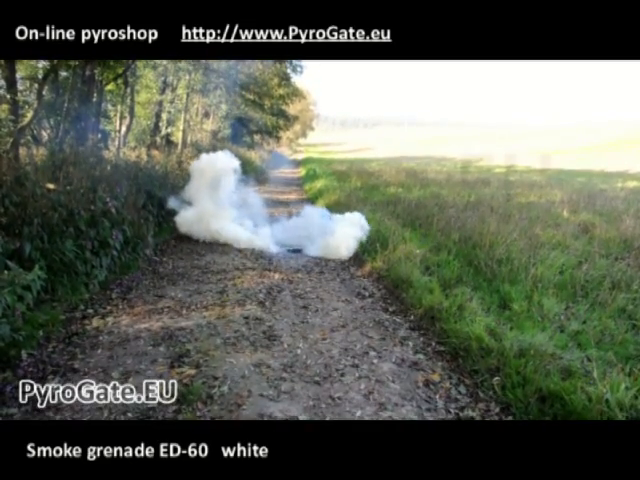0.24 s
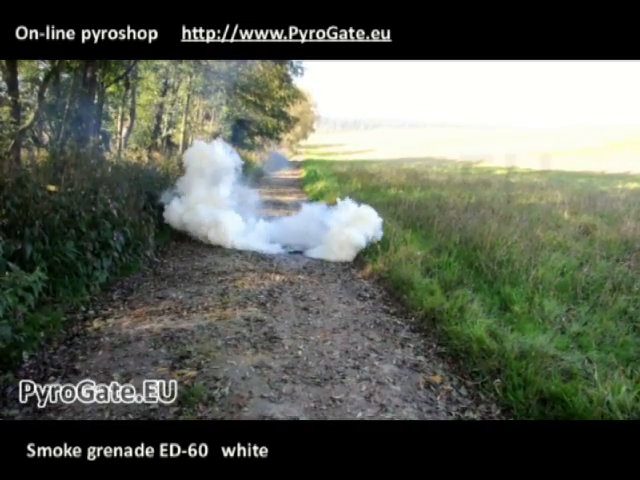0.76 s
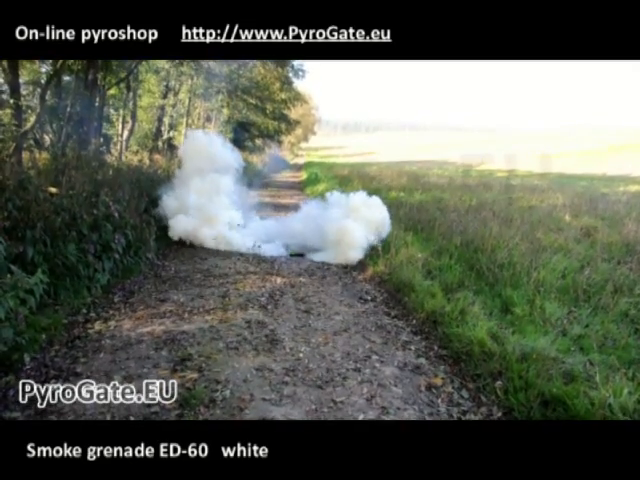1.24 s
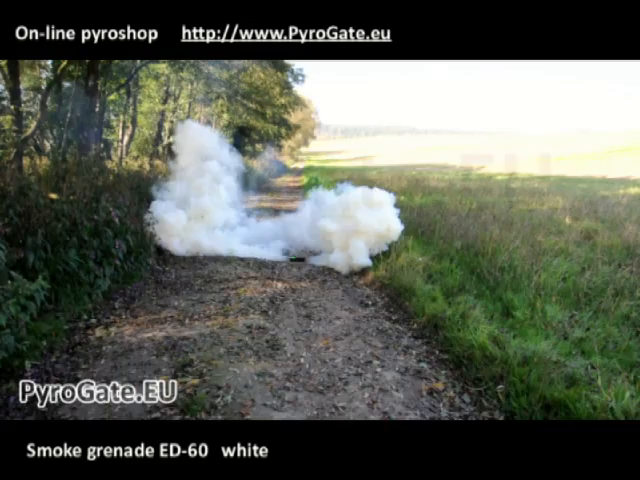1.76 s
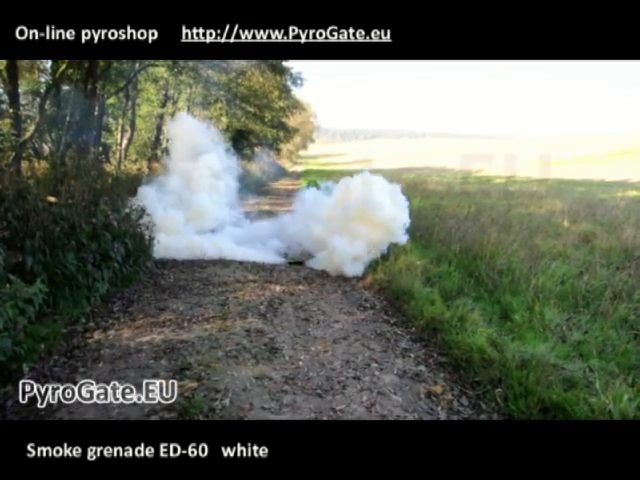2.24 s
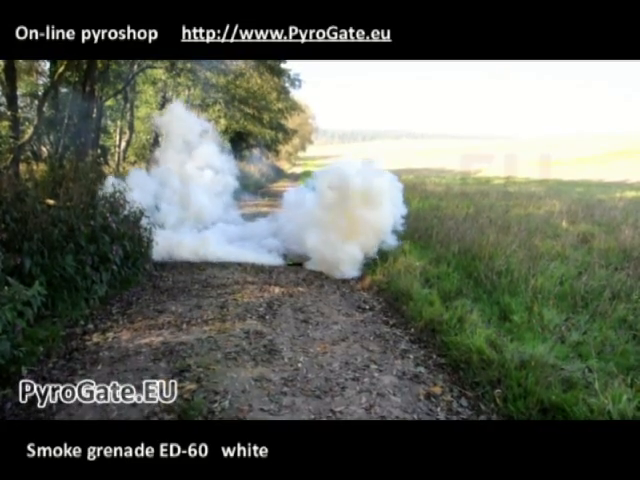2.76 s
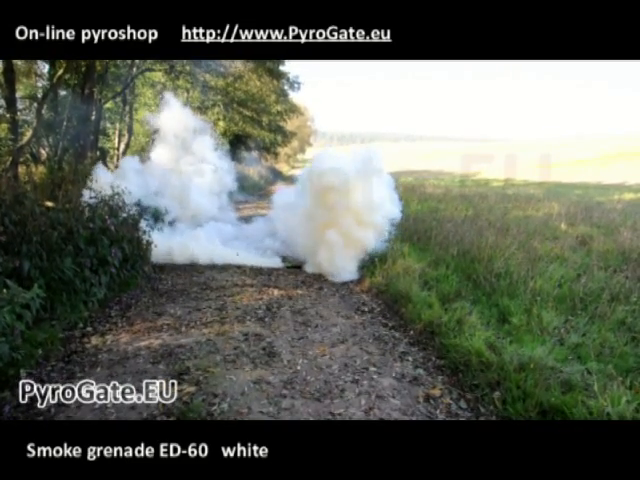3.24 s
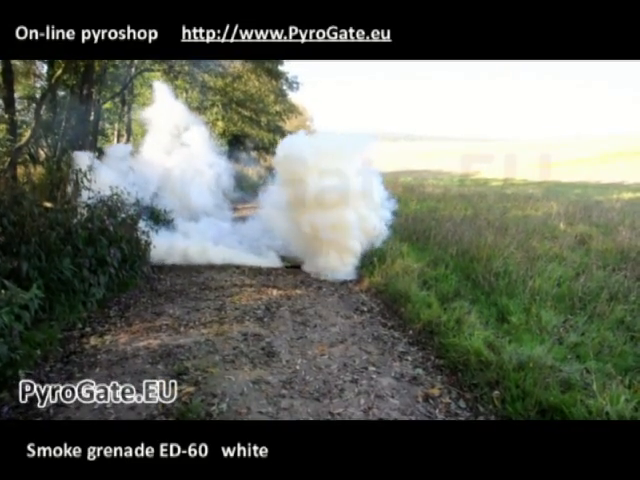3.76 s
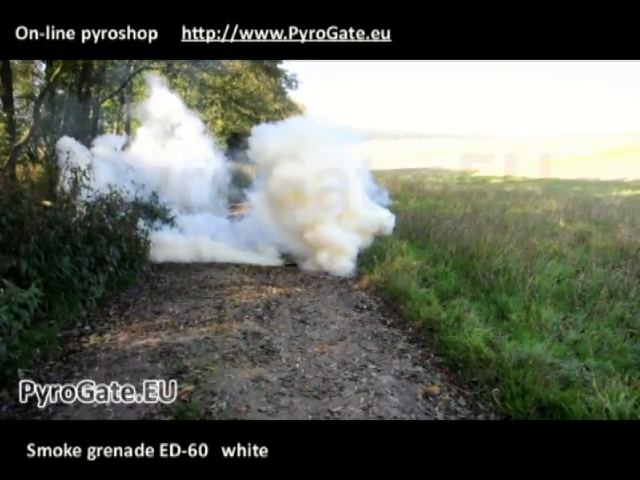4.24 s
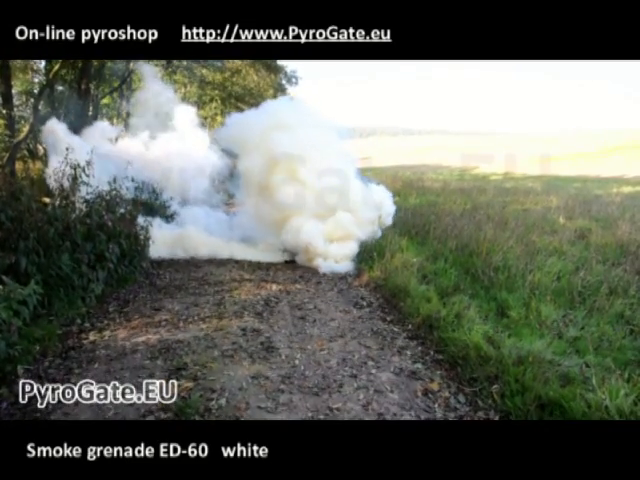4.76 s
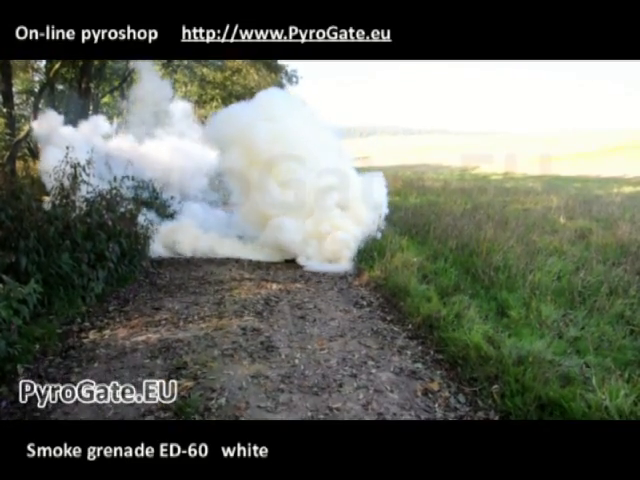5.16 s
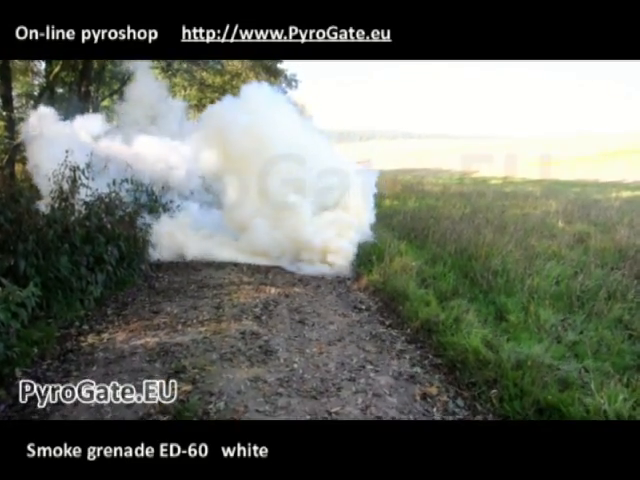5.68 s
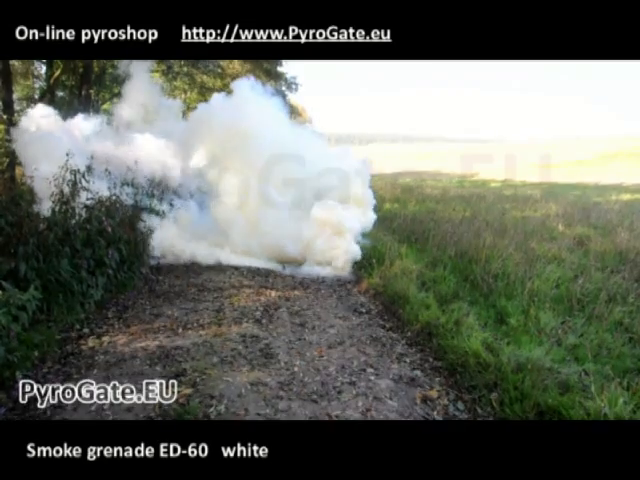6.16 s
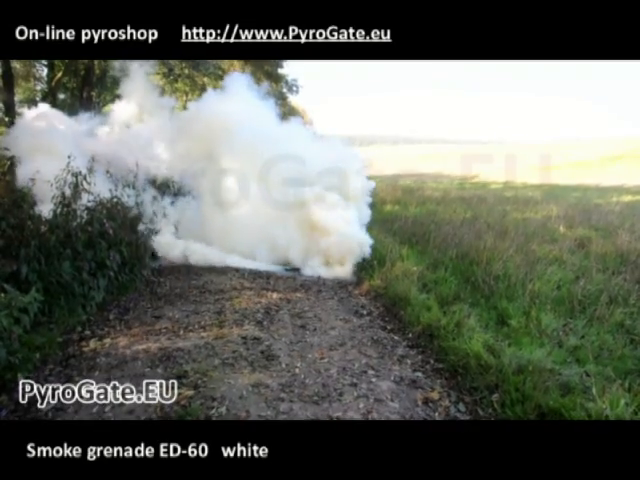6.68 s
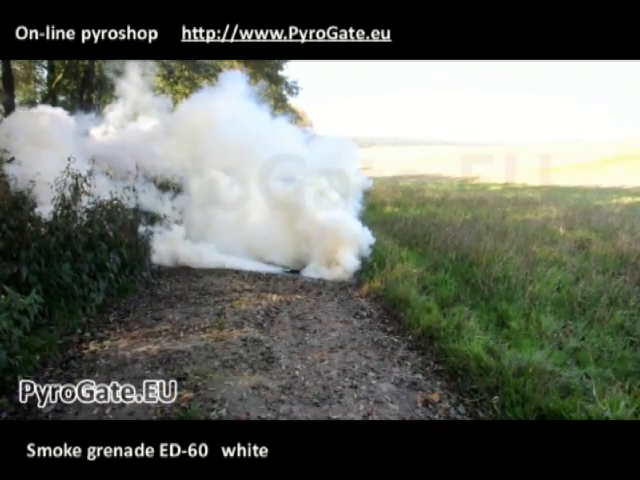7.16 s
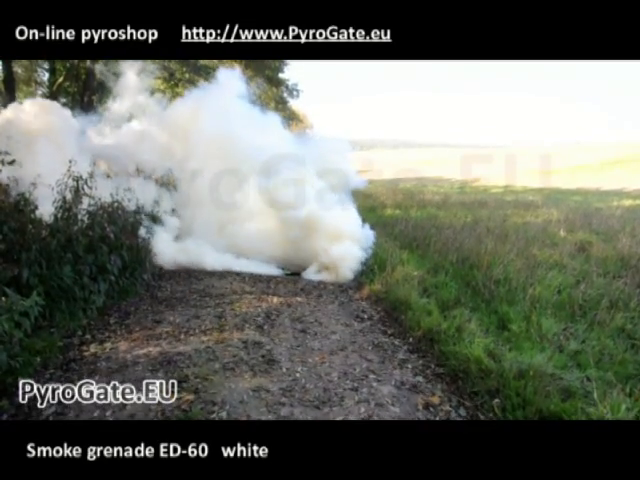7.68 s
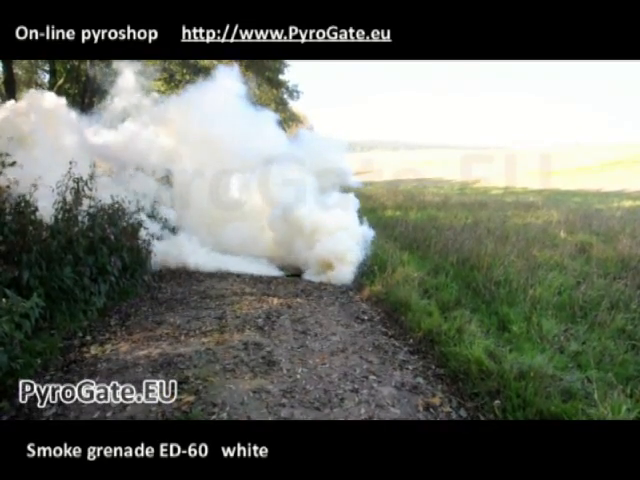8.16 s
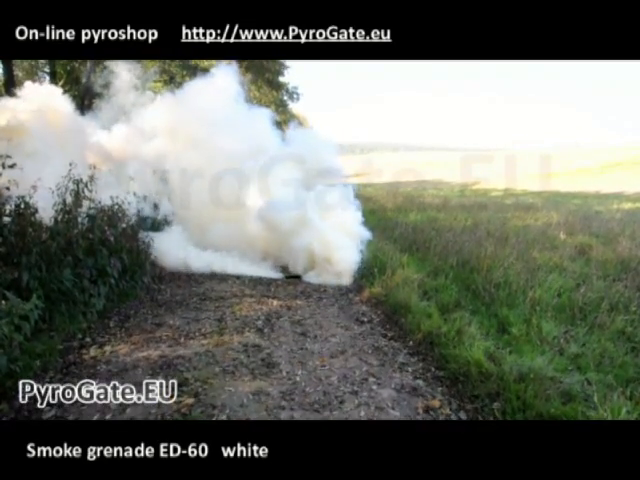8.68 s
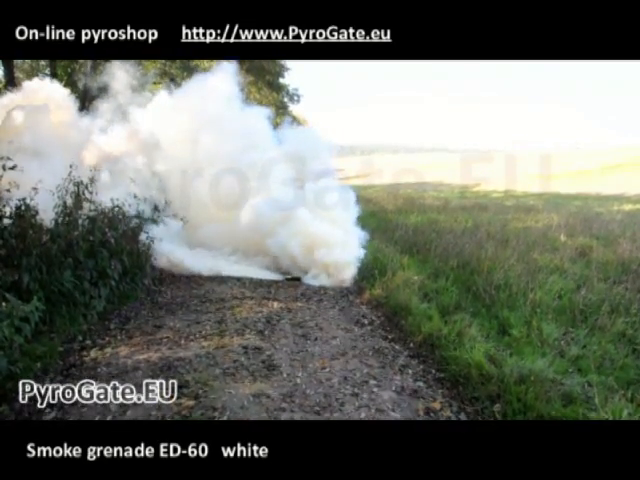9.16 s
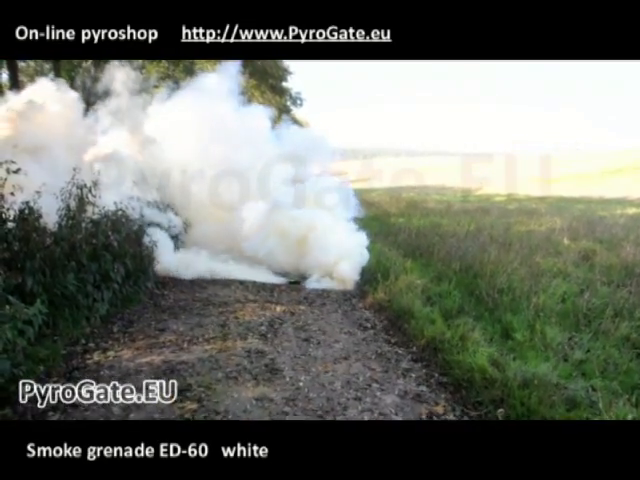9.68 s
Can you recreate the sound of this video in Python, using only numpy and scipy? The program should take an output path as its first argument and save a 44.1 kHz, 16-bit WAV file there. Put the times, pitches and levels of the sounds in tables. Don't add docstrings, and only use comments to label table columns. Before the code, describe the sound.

A smoke canister burns on a dirt track beside a field. Its continuous rasping hiss begins moderate, spits and surges within two seconds to a bright roar, then gradually softens into a duller hiss with a hollow sinking resonance. Trees answer faintly, low open air rumbles beneath, and small puffs bump the modest, narrow-band microphone.

```python
import sys
import numpy as np
from scipy import signal
from scipy.fft import rfft, irfft, next_fast_len
from scipy.io import wavfile
from scipy.ndimage import uniform_filter1d

SR = 44100
rng = np.random.default_rng(int(sys.argv[2]) if len(sys.argv) > 2 else 0)


def linear_from_db(decibels):
    return 10 ** (np.asarray(decibels, float) / 20)


def dump(signal):
    limited = np.clip(np.atleast_2d(signal).T, -1, 1)
    pcm = np.round(limited * 32767).astype(np.int16)
    wavfile.write(sys.argv[1], SR, pcm)


N = 437472


def rms_one(x):
    return x / np.sqrt(np.mean(x ** 2) + 1e-20)


def in_time(rows, times):
    s, *columns = np.transpose(rows)
    return np.array([np.interp(times, s, column) for column in columns])


def at_hz(points, hz):
    point_hz, point_db = np.transpose(points)
    return np.interp(np.log(hz), np.log(point_hz), point_db)


def coloured(x, spectrum):
    size = next_fast_len(N)
    hz = np.maximum(np.fft.rfftfreq(size, 1 / SR), 1)
    return irfft(rfft(x, size) * linear_from_db(at_hz(spectrum, hz)), size)[:N]


def filtered(x, order, hz, kind):
    return signal.sosfilt(signal.butter(order, hz, kind, fs=SR, output="sos"), x)


def drift(rate_hz):
    r = np.exp(-40 * np.pi * rate_hz / SR)
    steps = rng.standard_normal(N // 20 + 2002)
    slow = signal.lfilter([1], [1, -2 * r, r * r], steps)[2000:]
    return np.interp(np.arange(N) / 20, np.arange(len(slow)), rms_one(slow))


def swell(times, at_s, half_s):
    return np.exp(-((times - at_s) / half_s) ** 2)


def lift(hz, centre_hz, lift_db, octaves):
    return lift_db * np.exp(-1.1 * abs(np.log2(hz / centre_hz) / octaves) ** 1.4)


# start_s, flow_db, heat_db
BURN = [(0.0, -28.5, 2.5), (0.3, -29, 0), (0.6, -28.5, 2.5), (1.0, -24.5, 3.5), (1.25, -21, 4.5),
        (1.5, -19.5, 4), (1.9, -20.5, 5), (2.2, -20, 6), (2.6, -20.5, 6), (3.0, -21, 4.5), (3.3, -22.5, 1),
        (3.9, -23.5, 2), (4.9, -25.5, -1), (5.6, -27.5, -1), (6.6, -29, -2.5), (7.6, -29, -4.5),
        (8.4, -30, -2.5), (9.92, -30, -4.5)]
# centre_s, half_length_s, flow_db, heat_db, roar_db
SPURTS = [(0.201, .3, -0.55, 0.1, -1), (1.172, 0.061, -1, 0, 1), (1.384, 0.057, 4, 1, -3.5),
          (1.451, 0.034, 0.2, -0.5, 2.5), (1.586, 0.058, 2.5, 4.5, 0.4), (1.868, 0.043, -1.2, 2, 3),
          (1.944, 0.036, -1.5, -5.5, 0.5), (2.094, 0.87, 0, -0.4, 2.5), (2.252, .06, -0.2, 1, 1),
          (3.001, .07, 0.4, 0, 0.5), (3.6, .07, 0.5, 1, -0.5), (3.893, .06, 0.5, 0.5, -0.2),
          (6.403, 1, 0.45, 1, 1), (7.402, .4, -0.2, 2, 0.7), (8.398, 0.32, 0.5, -1.7, -0.5)]


def burn(times):
    controls = np.vstack([in_time(BURN, times), 0 * times])
    for s, half_s, *push_db in SPURTS:
        controls += np.outer(push_db, swell(times, s, half_s))
    return controls


# centre_s, half_length_s, pitch_hz, lift_db
PASSING_LIFTS = [(0.203, 0.56, 4000, 3.5), (0.302, .3, 3000, -1.5), (1.549, 0.74, 1970, -4.5),
                 (1.55, 0.22, 3070, -4.5), (2.1, 0.11, 1600, 5.5), (2.7, .3, 1000, 4), (4.6, 0.35, 4900, 3.5),
                 (7.101, .3, 2000, -1.5), (8.4, 1.3, 2650, 3.2), (1.25, 0.37, 160, -5.5), (2.2, .3, 430, -3),
                 (.75, .2, 2200, 1), (1.7, .3, 4600, 2), (3.2, .2, 1450, -1.5), (4.6, .5, 3100, 1),
                 (4.3, .5, 2400, -1), (3.9, 0.66, 2700, 2), (4.8, 1.2, 5600, -1.5), (6.9, .4, 2050, 1),
                 (6.9, .3, 1600, -1.5), (8.9, .8, 5500, 2.5), (7.9, .5, 350, 2.5), (2.5, .3, 620, 1),
                 (2.15, .2, 4300, 2.5), (1.6, .06, 5100, 1.5), (4.4, .2, 1550, 2), (7.1, .15, 2300, 0.5),
                 (1.5, .3, 7100, -4), (2.7, .4, 7100, -2), (4.15, .15, 2200, 1.5), (1.3, .04, 4900, -2),
                 (7.4, .8, 1880, 1)]


def can(hz, times):
    full_db, full_ends_s, full_fade_s = 3, 1.55, 0.15
    ring_db = full_db * (1 - np.tanh((times - full_ends_s) / full_fade_s)) / 2
    full = lift(hz, 1510, ring_db, 0.43)

    hollow_from_s, sink_s, grow_s = 2.56, 1.68, 1.6
    top_hz, rest_hz = 3730, 1702
    age = np.maximum(times - hollow_from_s, 0)
    sinking_hz = rest_hz + (top_hz - rest_hz) * np.exp(-age / sink_s)
    clear = 1 - np.exp(-age / grow_s)
    body = lift(hz, sinking_hz, 5.5, 0.42)
    core = lift(hz, sinking_hz, 1.5, 0.12)

    passing = sum(lift(hz, pitch_hz, db * swell(times, s, half_s), 0.12) for s, half_s, pitch_hz, db in PASSING_LIFTS)
    return clear * (body + core) + full + passing


CONTROL_HZ = [700, 1900, 3900, 5400]
# pitch_hz, level_db (per Hz)
JET = [(25, -33), (60, -21.5), (150, -3.5), (300, 3), (800, 2), (1500, 1.5), (2400, 1.5), (3800, 5),
       (5100, -1), (6100, -8.5), (6600, -20.5), (7000, -23), (7300, -28)]
# pitch_hz, depth_db
FLUTTER = [(200, 0.05), (1500, -0.68), (3000, -0.57), (6000, 0.33)]


def jet():
    frame, overlap = 512, 384
    hz, times, frames = signal.stft(rng.standard_normal(N), SR, nperseg=frame, noverlap=overlap)
    hz = np.maximum(hz, 20)[:, None]

    _, heat, roar = burn(times)
    tilt = np.array([roar, 0 * roar, 0.67 * heat, heat])
    tilt -= tilt.mean(axis=1, keepdims=True)
    share = np.hstack([np.interp(np.log(hz), np.log(CONTROL_HZ), row) for row in np.eye(4)])
    shape = linear_from_db(share @ tilt + can(hz, times))
    shape /= np.sqrt(np.mean((shape * linear_from_db(at_hz(JET, hz))) ** 2, axis=0))

    sputter = 0.7 * drift(6) + 0.8 * drift(30)
    gusts = in_time(np.c_[np.arange(N) / SR, sputter], times)
    patches = uniform_filter1d(rng.standard_normal(frames.shape), size=7, axis=0)
    patches = uniform_filter1d(patches, size=9, axis=1)
    shape *= linear_from_db(at_hz(FLUTTER, hz) * (gusts + 0.41 * rms_one(patches)))
    noise = signal.istft(frames * shape, SR, nperseg=frame, noverlap=overlap)[1][:N]

    rasp_db = drift(45) + 0.85 * drift(160) + 1.4 * drift(540)
    top = filtered(noise, 2, 2500, "high")
    noise = coloured(noise + top * (linear_from_db(rasp_db) - 1), JET)
    flow_db = burn(np.arange(N) / SR)[0]
    return linear_from_db(flow_db + 2.0) * rms_one(noise)


def peak(x, hz, width_hz, db):
    w, a = 2 * np.pi * hz / SR, linear_from_db(db / 2)
    k = np.pi * width_hz / SR
    above = [1 + k * a, -2 * np.cos(w), 1 - k * a]
    below = [1 + k / a, -2 * np.cos(w), 1 - k / a]
    return signal.lfilter(above, below, x)


# pitch_hz, width_hz, level_db
NEAR_BOUNCES = [(481, 50.5, -19), (526, 68, -2), (1037, 105, -8), (1386, 55, -2), (1686, 39, -3.5),
                (1800, 27, 1), (2180, 52, -1), (2270, 48, -1), (2740, 70, -9.5), (2837, 70, -4),
                (2993, 110, 0), (3415, 247, -8.5), (3650, 300, -0.5), (4373, 720, -6), (5120, 430, 2.5),
                (5454, 400, -4), (5520, 170, -3), (5950, 220, 1.5)]
# delay_s, level_db
TRACK_ECHOES = [(.00335, -31), (.0046, -40), (.008, -31)]


def path(x):
    for hz, width_hz, db in NEAR_BOUNCES:
        x = peak(x, hz, width_hz, db)
    return x + sum(linear_from_db(db) * np.roll(x, round(s * SR)) for s, db in TRACK_ECHOES)


def field():
    rumble = filtered(rng.standard_normal(N), 2, [45, 115], "band")
    hiss = filtered(rng.standard_normal(N), 3, [6500, 7600], "band")
    rumble_db, hiss_db = -60.5 + 1.3 * drift(2), -67
    return linear_from_db(rumble_db) * rms_one(rumble) + linear_from_db(hiss_db) * rms_one(hiss)


def wood(x):
    slap_s, slap_db = 0.0397, -15
    leaves_db, leaves_t60_s, leaves_rise_s = -16, 0.3, 0.03
    t = np.arange(SR // 5) / SR
    rise = np.minimum(t / leaves_rise_s, 1) ** 2
    scatter = rng.standard_normal(len(t)) * linear_from_db(-60 * t / leaves_t60_s) * rise
    reply = linear_from_db(leaves_db) * scatter / np.sqrt(np.sum(scatter ** 2))
    reply[round(slap_s * SR)] += linear_from_db(slap_db)
    reply = filtered(reply, 2, [1100, 3600], "band")
    return signal.fftconvolve(x, reply)[:N]


# start_s, peak_db, pitch_hz
PUFFS = [
    (4.32, -46, 35),
    (6.96, -46, 50),
    (7.205, -45, 58),
    (7.5, -39, 82),
    (8.88, -54, 35),
    (9.851, -36, 66),
]


def puffs():
    out, t = np.zeros(N), np.arange(SR // 16) / SR
    for s, db, hz in PUFFS:
        push = np.sin(2 * np.pi * hz * t) * (hz * t) ** 2 * np.exp(-3.2 * hz * t)
        at = round(s * SR)
        out[at:at + len(t)] -= linear_from_db(db) * push / abs(push).max()
    return out


def scene():
    hiss = jet()
    return (path(hiss + wood(hiss)) + field() + puffs())[None]


# pitch_hz,
# level_db
GHOST = [(8150, -29), (8400, -1), (8750, -27), (9050, -6.5), (9800, -14), (10500, -8), (11600, -3),
         (12800, 1.5), (14500, 8)]


def ghost(x):
    shift_hz, level_db = 7740, -50
    turning = np.exp(2j * np.pi * shift_hz * np.arange(N) / SR)
    moved = signal.hilbert(x, next_fast_len(N))[:N] * turning
    return linear_from_db(level_db) * coloured(moved.real, GHOST)


def drop_bands(x, level_db):
    bands = [(7850, 9000, level_db + 25.5),
             (9000, 9700, level_db / 2 + 10),
             (14300, 15500, -25 - level_db)]
    for low_hz, high_hz, gone in bands:
        window = [(low_hz - 30, -200), (low_hz, 0), (high_hz, 0), (high_hz + 30, -200)]
        band = coloured(x, window)
        x = x - band * (1 + np.tanh(3.0 * (gone + 1.5 * drift(15)))) / 2
    return x


def top_cut(x):
    return signal.sosfilt(signal.butter(12, 15000, fs=SR, output="sos"), x)


def record(dry):
    edge_hz, mic_cut_hz = 7336, 40
    x = signal.sosfilt(signal.ellip(9, 0.5, 70, edge_hz, fs=SR, output="sos"), dry[0])
    x = filtered(x, 2, mic_cut_hz, "high")
    level_db = 10 * np.log10(uniform_filter1d(x ** 2, size=4096) + 1e-12)
    mix = drop_bands(x + ghost(x), level_db)
    return top_cut(mix[None])


dry = scene()
out = record(dry)
dump(out)
```